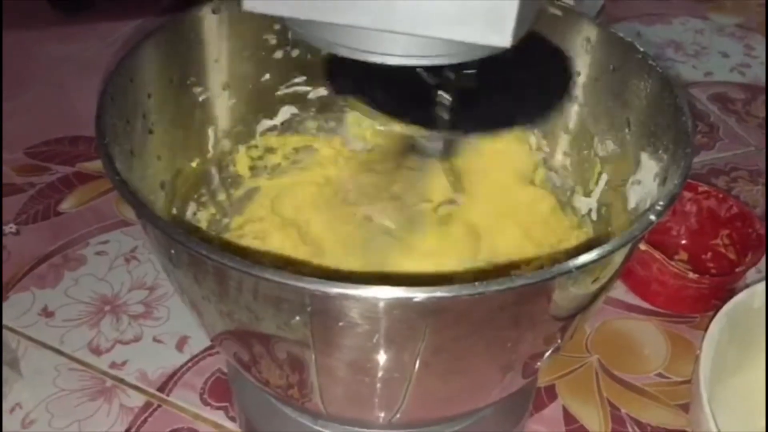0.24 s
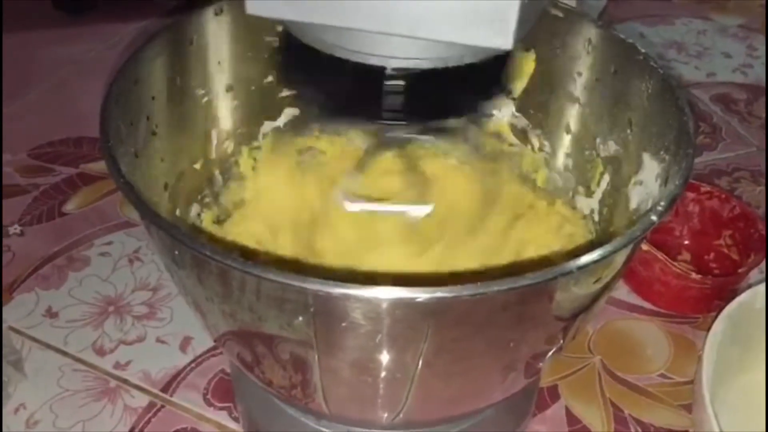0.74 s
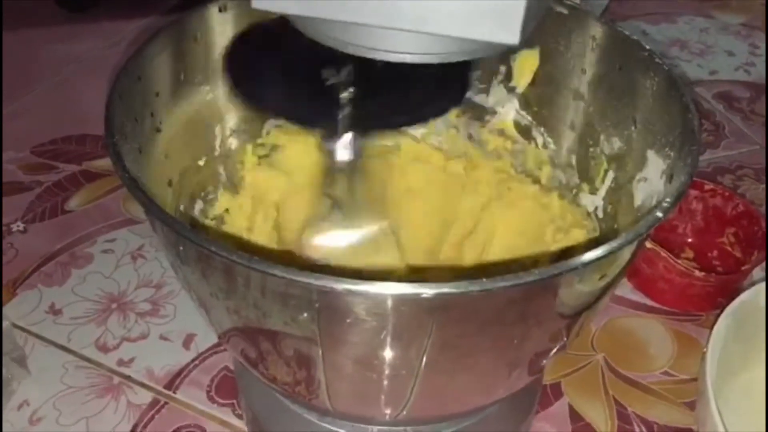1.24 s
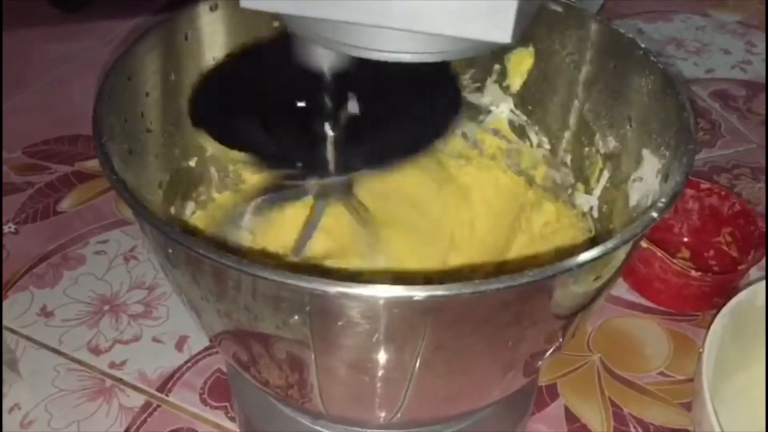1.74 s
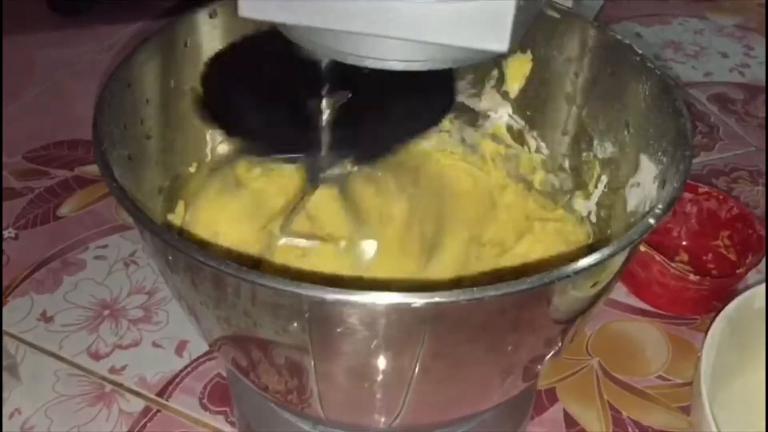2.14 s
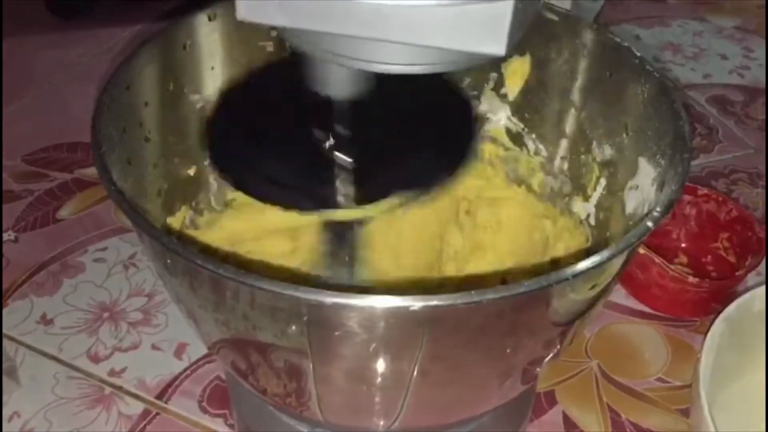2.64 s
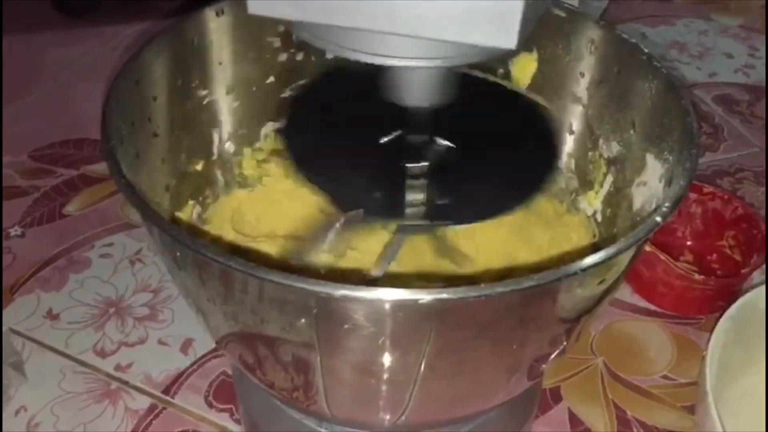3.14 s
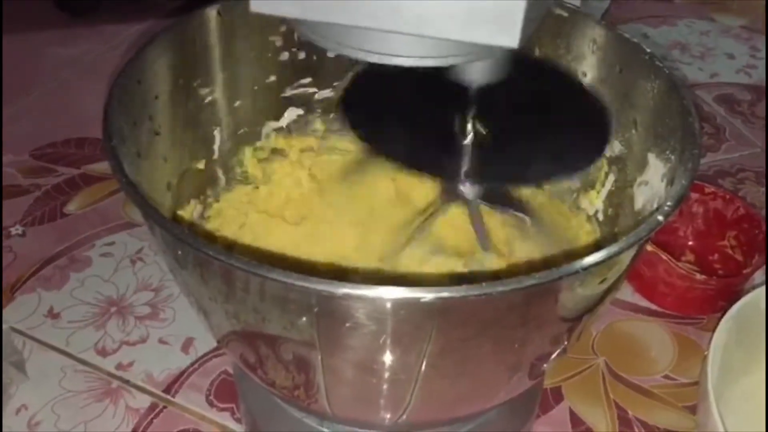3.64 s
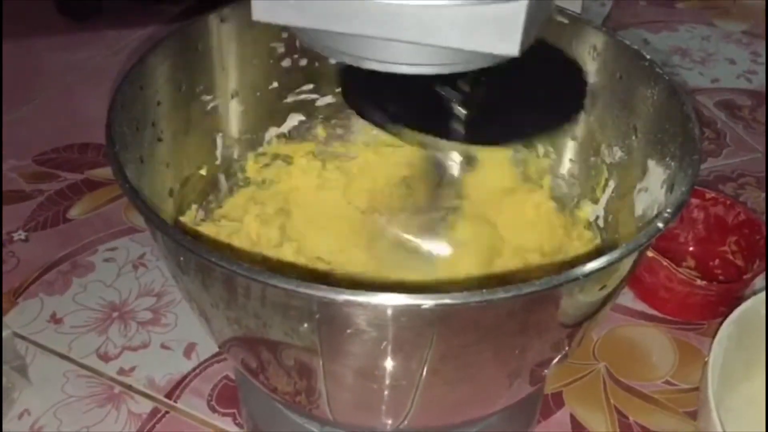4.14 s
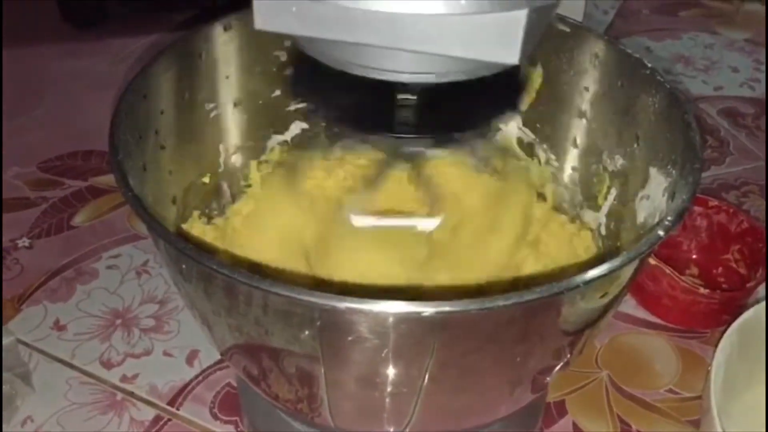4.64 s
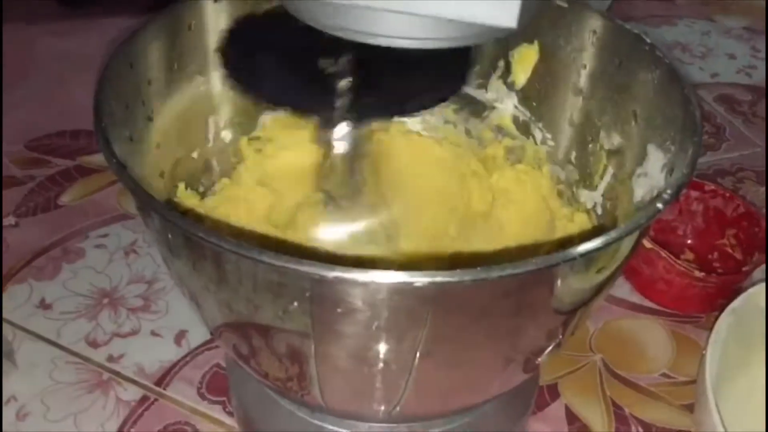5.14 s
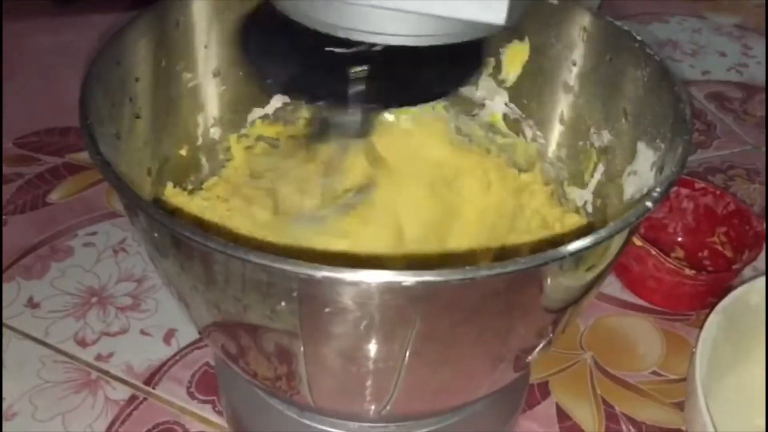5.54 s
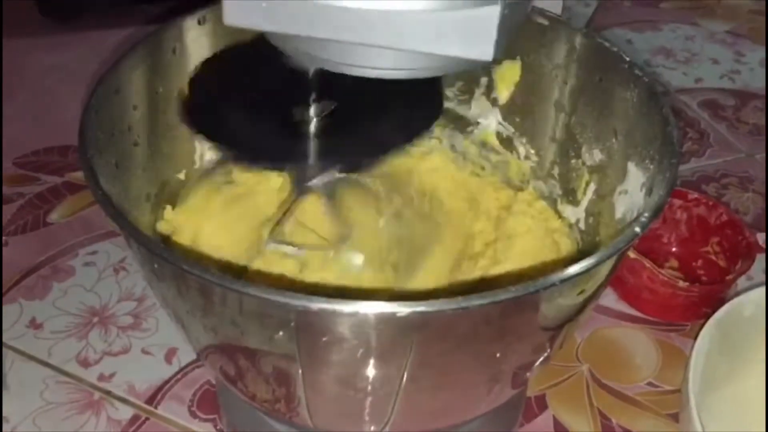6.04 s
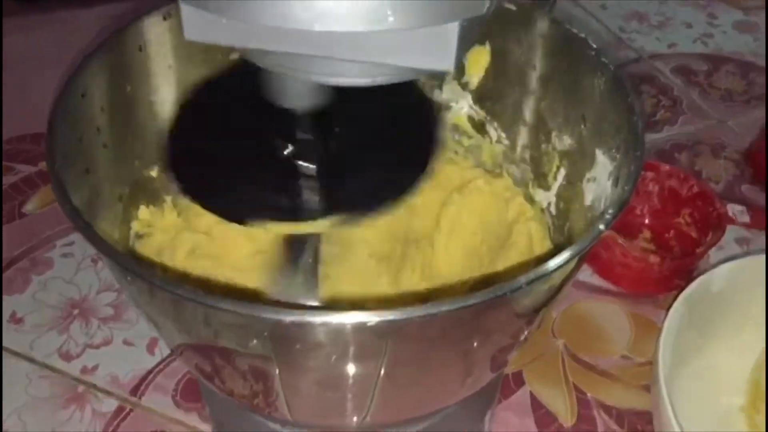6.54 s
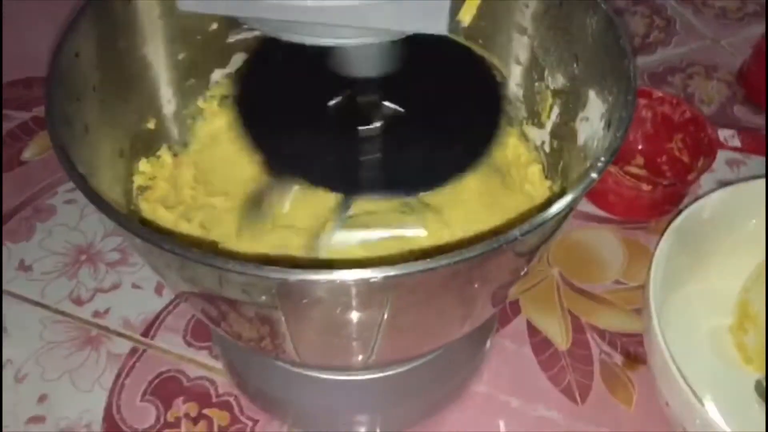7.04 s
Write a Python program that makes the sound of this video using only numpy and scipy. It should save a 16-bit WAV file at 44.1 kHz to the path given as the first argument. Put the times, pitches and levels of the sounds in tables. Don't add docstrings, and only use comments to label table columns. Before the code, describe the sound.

Constant mixer noise heard from very near: a buzzing mid-pitched whine over rasping gears and rushing cooling air, coloured by the ringing housing and metal bowl. The beater's quick orbit makes it throb, with faint uneven dough drag in the treble. Pitch barely creeps upward, and the tone turns a little brighter toward the end. Faint table thrum, little bass, slightly gritty phone capture, no pause.

```python
import sys
import numpy as np
from scipy import signal
from scipy.fft import rfft, irfft, next_fast_len
from scipy.io import wavfile
from scipy.ndimage import uniform_filter1d

SR = 44100
rng = np.random.default_rng(int(sys.argv[2]) if len(sys.argv) > 2 else 0)


def master_out(mix):
    frames = np.transpose(np.atleast_2d(mix))
    ceiling = np.clip(frames, -1, 1)
    pcm = np.round(ceiling * 32767).astype(np.int16)
    wavfile.write(sys.argv[1], SR, pcm)


def decibels_to_gain(level_db):
    exponent = np.asarray(level_db, float) / 20
    return 10 ** exponent


N = 321930
T = np.arange(N) / SR

COUNTER_RATIO, OUTPUT_RATIO, ORBIT_RATIO, KNEAD_RATIO = .307, .0677, .01194, .00354
SMEAR_RAD = .26


def walk(rate):
    hold = int(SR / rate)
    steps = np.repeat(rng.standard_normal(N // hold + 1), hold)
    return 1.3 * uniform_filter1d(uniform_filter1d(steps, hold), hold)[:N]


def shaped(x, gain):
    size = next_fast_len(len(x))
    hz = np.arange(size // 2 + 1) * SR / size + 1e-3
    return irfft(rfft(x, size) * gain(hz), size)[:len(x)]


def resonance(hz, width):
    return lambda f: 1 / (1 + ((f ** 2 - hz ** 2) / (f * width)) ** 2)


def tone(turns, order, db, unsteady_db, rate, phase):
    level = np.sqrt(2) * decibels_to_gain(db + unsteady_db * walk(rate))
    return level * np.cos(2 * np.pi * order * turns + phase)


# (time [s], shaft speed [Hz])
MOTOR_SPEED = [(0.0, 191.2), (0.55, 191.67), (0.85, 190.87), (1.2, 191.51), (1.65, 191.81), (2.35, 192.7),
               (2.65, 192.19), (3.1, 192.44), (3.7, 192.77), (4.15, 193.61), (4.9, 192.62), (5.15, 192.59),
               (5.45, 193.77), (6.1, 192.72), (6.7, 193.47), (7.3, 192.95)]


def motor():
    return np.cumsum(np.interp(T, *np.transpose(MOTOR_SPEED))) / SR


# (time [s], lean [-1 to 1])
PHONE_LEAN = [
    (0, -.5),
    (1, -0.69),
    (2.4, -0.27),
    (4.2, 0.37),
    (5, 0.29),
    (6.2, 0.36),
    (7.3, 0.96),
]
# (order [per shaft turn], lean gain [dB], lump swing [dB],
# orbit swing [dB], orbit peak [turns]); a negative lump swing peaks when the gears run freely
ORDER_SWINGS = [(1, 1, -1, 6.5, 0.31), (2, 1, 5, 2, .08), (3, -2, 0, .3, 0.19), (4, -0.2, 1.8, 0.3, 0.66),
                (5, 0.2, -.4, 1.9, .79), (6, -1.5, 2.3, 1.5, 0.23), (7, -6, -4, 1.5, .48),
                (8, 0, 2.5, 2, 0.56), (9, -2, -1.9, 0.5, 0), (10, 2.5, 3.5, 0.5, .04),
                (11, 7.5, .3, 0.5, 0.79), (12, 6, -8, 1, 0.14), (13, 3, 3, 2, .5), (14, -10, 7, 3, .83),
                (15, -6, .2, 0, .89), (18, -6, 1, 1.2, .51)]
# (order [per shaft turn], swing [dB], peak [turns])
BLADE_BITES = [(1, 2, 0.15), (3, 1, 0), (4, .9, 0.76), (5, 1.2, 0.41), (7, 0.3, 0.89), (9, 0.9, 1),
               (12, 3.5, .78)]
# (lean [dB], lump [dB], orbit [dB], bite [dB], chance slaps [dB])
DOUGH_DRAG = [
    (-.6, -0.7, 0, 0.7, 1.6),
    (.6, 0.2, 0, 0, 0.2),
    (.6, 0, 0.5, 0.1, 0.36),
]


def beater(turns):
    def swing(ratio, start):
        return np.cos(2 * np.pi * (ratio * turns - start))

    lean = np.interp(T, *np.transpose(PHONE_LEAN))
    lump = swing(KNEAD_RATIO, 0.23)
    slack = swing(KNEAD_RATIO, 0.82)
    load_db = {}
    for order, lean_db, lump_db, orbit_db, start in ORDER_SWINGS:
        kneading = lump if lump_db > 0 else -slack
        load_db[order] = lean_db * lean + lump_db * kneading + orbit_db * swing(ORBIT_RATIO, start)
    for order, db, start in BLADE_BITES:
        load_db[order] = load_db[order] + db * swing(2 * ORBIT_RATIO, start)
    load_db["side"] = 3.5 * lump
    for order, db in load_db.items():
        load_db[order] = db - 10 * np.log10(np.mean(decibels_to_gain(2 * db)))
    load_db[1] = load_db[1] + 2
    orbit, bite = swing(ORBIT_RATIO, 0.73), swing(2 * ORBIT_RATIO, 0.57)
    slaps = walk(9)
    return load_db, np.array(DOUGH_DRAG) @ [lean, lump, orbit, bite, slaps]


LOADED_ORDERS = (1, 4, 6, 9, 11)
# (order [per shaft turn], level [dB], countershaft sideband below [dB], above [dB],
# output gear sideband below [dB], above [dB])
SHAFT_TONES = [(1, -37.0, -63.0, -57.0, -49.0, -41.0), (2, -38.0, -53.0, -48.0, -51.0, -64.0),
               (3, -33.0, -53.0, -47.0, -47.0, -53.0), (4, -23.0, -44.0, -56.0, -41.0, -45.0),
               (5, -28.0, -35.0, -42.0, -40.0, -38.0), (6, -25.0, -46.0, -40.0, -34.0, -47.0),
               (7, -35.0, -49.0, -49.0, -51.0, -54.0), (8, -38.0, -45.0, -41.0, -46.0, -46.0),
               (9, -25.0, -45.0, -42.0, -49.0, -52.0), (10, -33.0, -47.0, -47.0, -58.0, -50.0),
               (11, -29.0, -42.0, -35.0, -59.0, -55.0), (12, -35.0, -47.0, -39.0, -51.0, -48.0),
               (13, -47.0, -46.0, -41.0, -63.0, -61.0), (14, -44.0, -36.0, -59.0, -54.0, -55.0),
               (15, -46.0, -56.0, -53.0, -64.0, -59.0), (16, -50.0, -47.0, -48.0, -51.0, -60.0),
               (17, -50.0, -53.0, -57.0, -63.0, -55.0), (18, -44.0, -51.0, -68.0, -61.0, -67.0)]
# (order [per shaft turn], level [dB])
GEAR_TONES = [(.243, -62), (.307, -61), (.483, -60), (.777, -60), (1.917, -45), (2.927, -46), (3.61, -48),
              (3.973, -41), (4.39, -46), (4.6, -46), (5.61, -44), (8.78, -43), (10.39, -44), (11.08, -42),
              (13.387, -43), (21.39, -49)]


def whine(turns, load_db):
    out = 0
    for order, db in GEAR_TONES:
        out = out + tone(turns, order, db, 2.6, rate=2.97, phase=2 * np.pi * rng.random())
    offsets = (-COUNTER_RATIO, COUNTER_RATIO, -OUTPUT_RATIO, OUTPUT_RATIO)
    for order, (_, db, *side_db) in enumerate(SHAFT_TONES, 1):
        rate = 30 if order in LOADED_ORDERS else 9
        phase = -1.27 + SMEAR_RAD * order ** 2
        unsteady_db = .8 + .14 * order
        out += tone(turns, order, db + load_db.get(order, 0), unsteady_db, rate, phase)
        for offset, weak_db in zip(offsets, side_db):
            swells = order >= 11 and abs(offset) == COUNTER_RATIO
            swell_db = load_db["side"] * swells
            phase = 2 * np.pi * rng.random()
            out += tone(turns, order + offset, weak_db + swell_db, 1.6, rate=5, phase=phase)
    return out


# (centre [Hz], width [Hz], gain [dB])
NARROW_BANDS = [(880, 40, 3.5), (2060, 36, -1.5), (2830, 60, 0), (2960, 40, -10.5), (3830, 120, -1.5),
                (4300, 88, -2), (5120, 130, -3), (6560, 220, -1.5), (8000, 200, -1.5), (9400, 300, -1.5),
                (10370, 250, -4)]


def patchy_treble(x, patchy_db, from_hz):
    x = shaped(x, lambda f: decibels_to_gain(sum(db * resonance(hz, width)(f) for hz, width, db in NARROW_BANDS)))
    hz, _, cells = signal.stft(x, SR, nperseg=512)
    patches = uniform_filter1d(rng.standard_normal(cells.shape), size=2, axis=0)
    patches = uniform_filter1d(patches, size=8, axis=1)
    treble = np.clip(hz / from_hz - .5, 0, 1)[:, None]
    gain = decibels_to_gain(patchy_db * patches / patches.std() * treble)
    gain = gain / np.sqrt(np.mean(gain ** 2, axis=1, keepdims=True))
    return signal.istft(cells * gain, SR)[1][:N]


# (centre [Hz], width [Hz], level [dB per Hz])
BODY_RINGS = [(275, 220, -55), (606, 130, -56.0), (759, 110, -52.5), (1013, 196, -50), (1176, 120, -48.5),
              (1330, 39, -50.5), (1563, 500, -52), (1930, 130, -51), (2218, 526, -50.5), (2587, 110, -51),
              (2617, 92, -54.5), (3100, 870, -54.5), (3985, 740, -62.5), (4460, 530, -62.5),
              (5280, 234, -59.5), (6040, 2900, -66), (8820, 3260, -70.5), (11310, 1100, -74.5),
              (199, 45, -58), (413, 110, -59.5), (1728, 62, -47.5), (2336, 31, -47), (3045, 68, -53),
               (6350, 103, -61.5), (7000, 150, -67), (7100, 300, -78), (8600, 490, -77.5),
               (10030, 400, -74)]


def rattle(turns, drag_db):
    knock = np.cos(2 * np.pi * turns + 10 * SMEAR_RAD)
    puff = 1 + .07 * np.cos(2 * np.pi * COUNTER_RATIO * turns)
    lurch = .8 * np.cos(2 * np.pi * (OUTPUT_RATIO * turns - .4)) + .6 * walk(25)
    grit = decibels_to_gain(0.49 * walk(300))
    out = 0
    for hz, width, db in BODY_RINGS:
        treble = np.clip(np.log2(hz / 1800) / 1.44, 0, 1)
        drag = drag_db[np.searchsorted((3900, 7200), hz)]
        sway_db = treble * (drag + lurch) + 0.6 * walk(8)
        rasp = 1 + (.4 - .35 * treble) * knock
        noise = rng.standard_normal(N) * rasp * (puff * grit) ** treble
        ring = shaped(noise, resonance(hz, width))
        out = out + decibels_to_gain(db + sway_db) * np.sqrt(SR / 2) * ring
    return patchy_treble(out, patchy_db=2.5, from_hz=3500)


# (frequency [Hz], level [dB per Hz])
THRUM = [(12, -62), (20, -36), (43, -28), (86, -16), (145, -6.5), (155, -12), (170, -4), (220, -36),
         (370, -120)]


def rumble():
    hz, db = np.transpose(THRUM)
    noise = rng.standard_normal(N)
    low = shaped(noise, lambda f: decibels_to_gain(np.interp(np.log(f), np.log(hz), db, right=-80)))
    return decibels_to_gain(-50.5) * low / np.std(low)


def scene():
    turns = motor()
    load_db, drag_db = beater(turns)
    chatter = rattle(turns, drag_db)
    chatter = shaped(chatter, lambda f: 1 / np.sqrt(1 + (172 / f) ** 24 + (f / 11790) ** 90))
    return np.tile(whine(turns, load_db) + chatter + rumble(), (2, 1))


def gate(x, under_db, floor_db, from_hz):
    hz, _, cells = signal.stft(x, SR, nperseg=2048, noverlap=1024)
    power = np.abs(cells) ** 2
    band = uniform_filter1d(power, size=6, axis=0)
    around = uniform_filter1d(power, size=70, axis=0)
    weak = band < around * decibels_to_gain(2 * under_db) + decibels_to_gain(2 * floor_db)
    dropped = weak & (hz > from_hz)[:, None]
    return signal.istft(cells * ~dropped, SR, noverlap=1024)[1][:N]


# (time [s], low edge [Hz], high edge [Hz])
EAR_BURSTS = [(.035, 5600, 6900), (.64, 10270, 12000), (.942, 8900, 10370), (1.058, 9620, 11040),
              (1.312, 7550, 8960), (1.405, 4200, 5730), (1.498, 4660, 5720), (2.218, 4630, 6930),
              (2.45, 10300, 11800), (2.474, 6850, 8880), (2.636, 9600, 10920), (3.1, 4200, 5100),
              (3.1, 6800, 8200), (3.751, 7530, 8960), (4.052, 4230, 6250), (4.656, 4140, 8320),
              (5.004, 5130, 6910), (5.678, 4210, 5190), (5.818, 8210, 10370), (5.864, 5610, 7650),
              (6.955, 4160, 5130), (7.002, 7550, 8930), (7.002, 10320, 12000)]


def ear_bursts(mono):
    backwards, side = mono[::-1], np.zeros(N)
    fade = np.sin(np.pi * np.arange(2048) / 2048)
    for s, low_hz, high_hz in EAR_BURSTS:
        start = min(int(s * SR) - 1024, N - 2048)
        piece = fade * backwards[start:start + 2048]
        band = shaped(piece, lambda f: (f > low_hz) & (f < high_hz))
        side[start:start + 2048] += decibels_to_gain(-2.6) * band * fade ** 0
    return side


def low_pass(x):
    return signal.sosfilt(signal.butter(12, 12190, fs=SR, output="sos"), x)


def record(dry):
    bent = dry[0] + .05 * shaped(dry[0] ** 2, lambda f: f > 180)
    rounded = np.tanh(.65 * bent) / .65
    mono = gate(rounded, under_db=-9, floor_db=-71.5, from_hz=3500)
    side = ear_bursts(mono)
    return low_pass(np.array([mono + side, mono - side]))


dry = scene()
out = record(dry)
master_out(out)
```